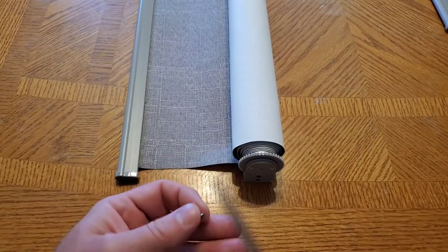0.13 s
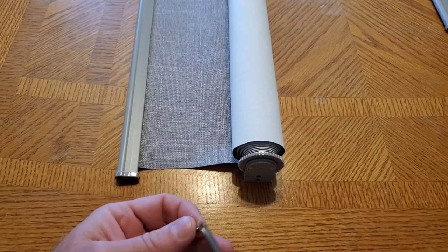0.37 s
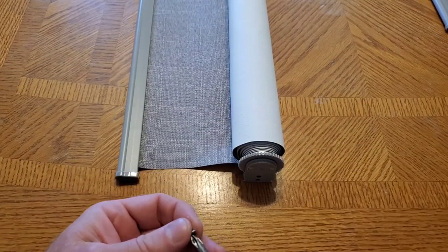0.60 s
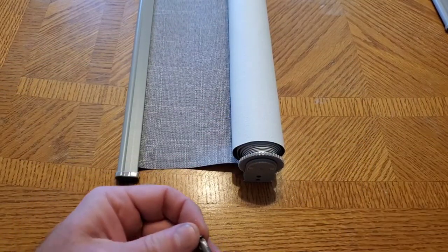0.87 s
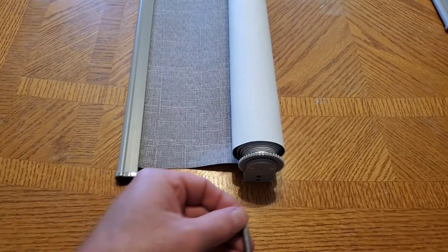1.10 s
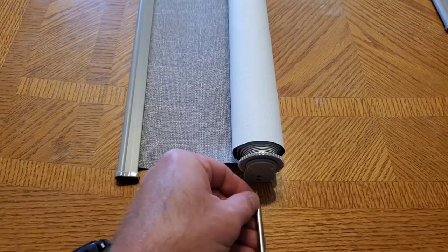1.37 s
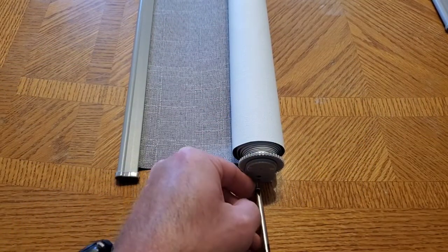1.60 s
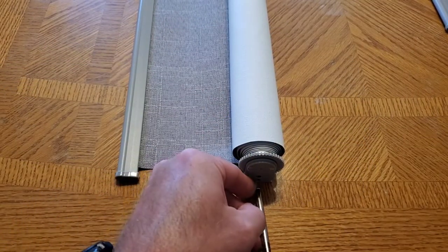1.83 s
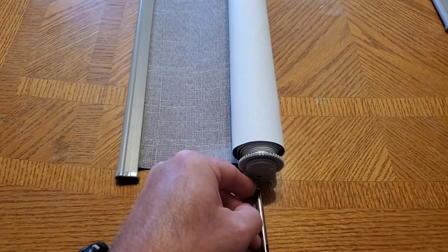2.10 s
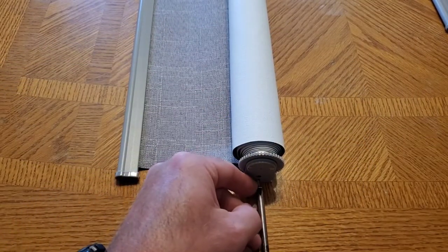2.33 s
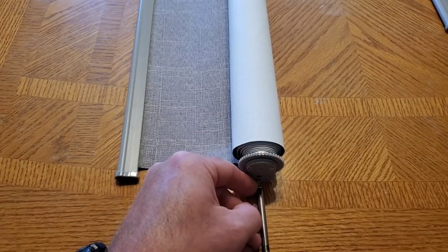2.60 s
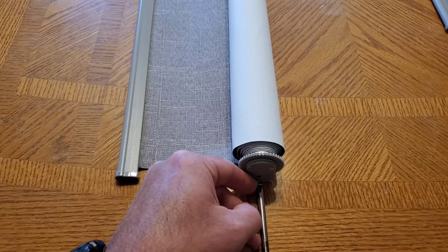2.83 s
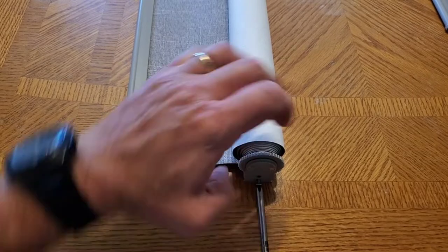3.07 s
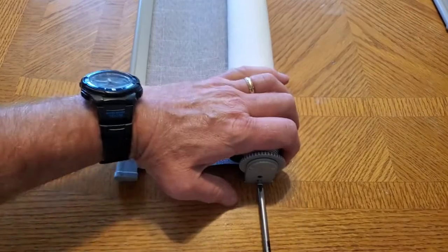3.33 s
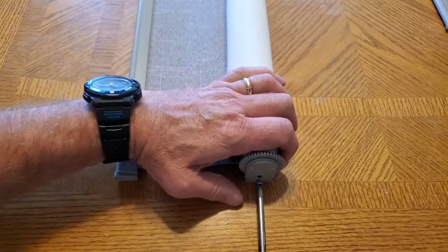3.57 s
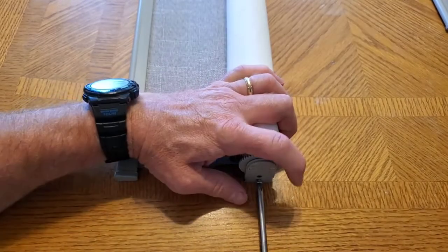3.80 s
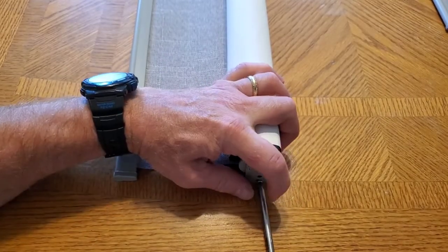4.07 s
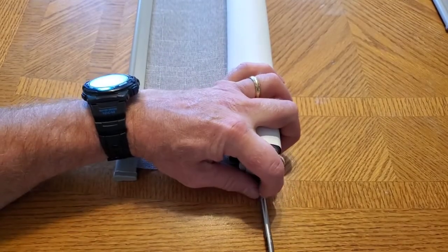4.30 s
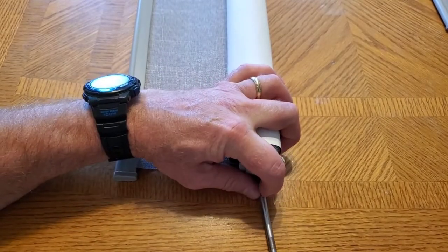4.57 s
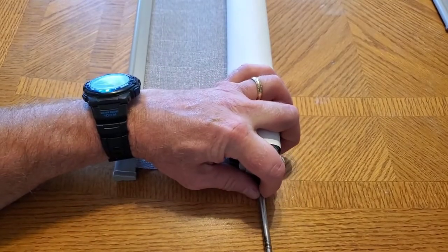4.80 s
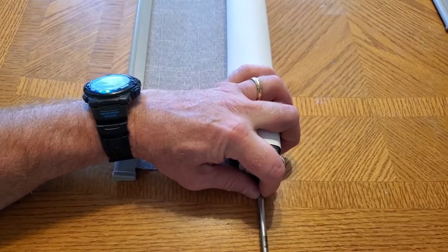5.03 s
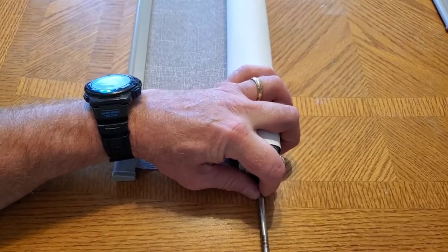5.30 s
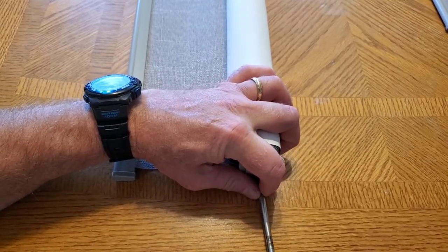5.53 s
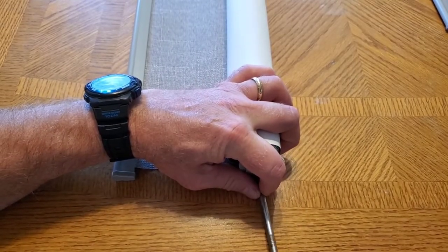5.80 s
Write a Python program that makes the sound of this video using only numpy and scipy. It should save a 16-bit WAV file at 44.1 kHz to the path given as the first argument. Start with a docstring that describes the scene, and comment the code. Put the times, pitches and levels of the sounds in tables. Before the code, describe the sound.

Quiet handling in a bare room: tiny metallic clicks, soft rustle, hollow knocks and short scrapes, building to one sharp loud clack near the end.

```python
"""Dull knocks with a wooden boom, small steel ticks, scraping and hand rustle in a bare room; hum and air below.
A screw is driven by hand into the plastic cap of a hollow roller tube lying on a wooden table.
Blows set resonances of cap, tube, table and steel ringing; trains of small slips rub the same resonances.
Contacts pass through a reverberant room; skin hiss and air are banded stereo noise.
Two wavering low hum lines and two faint hissy bands are resonated noise."""
import sys
import numpy as np
from scipy import signal
from scipy.io import wavfile

SR = 44100
rng = np.random.default_rng(int(sys.argv[2]) if len(sys.argv) > 2 else 0)


def voltage_ratio(decibels):
    """Convert decibels (scalar or array-like) to amplitude ratios, 20 dB per decade."""
    exponent = np.asarray(decibels, float) / 20
    return 10 ** exponent


def output_pcm(signal):
    """Save a mono or channel-first signal as 16-bit PCM at the path in sys.argv[1].

    Samples are clipped to [-1, 1] before scaling.
    """
    pcm = np.clip(np.atleast_2d(signal).T, -1, 1) * 32767
    wavfile.write(sys.argv[1], SR, np.round(pcm).astype(np.int16))


N = 260491
RUN_IN = 4410  # samples ahead of t = 0
EDGES = 30 * 2 ** np.arange(0, 9.3, 1 / 3)  # third-octave band edges/Hz

# resonances of the wooden table: f/Hz, level/dB, t60/s
TABLE_MODES = [(68.5, -25.5, 0.2), (107.5, -15, 0.19), (139.5, -18.5, 0.13), (180.1, -8, 0.048),
               (225, -16.5, 0.055)]
# resonances of the hollow tube: f/Hz, level/dB, t60/s
TUBE_MODES = [(283, -11.5, 0.23), (310.8, -7, 0.045), (370, -2.5, 0.049), (449.4, -8.5, 0.032),
              (524, -2, 0.014)]
# resonances of the plastic cap: f/Hz, level/dB, t60/s
CAP_MODES = [(573, -1.5, 0.019), (723.4, -7, 0.04), (823, -2.5, 0.038), (928, -8, 0.024), (1044, 1, 0.01),
             (1280, 3.5, 0.018), (1316.4, 5.5, 0.012), (1498, 2, 0.0079), (1595, -10.5, 0.0032)]
# resonances of loose parts under the cap: f/Hz, level/dB, t60/s
RATTLE_MODES = [(1840, 9.5, 0.005), (1987, 4, 0.015), (2470, 11, 0.0043), (3070, 1, 0.0081),
                (3300, 1, 0.0066), (3520, -1, 0.0076), (4200, -3.5, 0.0077), (4650, -2.5, 0.0043),
                (5070, -3, 0.0043)]
# resonances of the sharp crack: f/Hz, level/dB, t60/s
CRACK_MODES = [(5560, 2.5, 0.00076), (6600, 3, 0.002), (9450, 2.5, 0.0023), (11200, -1.5, 0.0015),
               (14500, 4, 0.0026)]
# left-right likeness of noise and echoes: f/Hz, likeness (0 to 1)
LIKENESS = [(40, 1), (120, 0.83), (300, 0.74), (1000, 0.035), (4000, 0.013), (16000, 0.023)]


def rms_one(x):
    """Scale to rms 1."""
    return x / np.sqrt(np.mean(x ** 2) + 1e-20)


def at_hz(points, hz):
    """Read a spectrum on a log frequency axis."""
    points = np.array(points)
    return np.interp(np.log(hz), np.log(points[:, 0]), points[:, 1])


def band(x, low_hz, high_hz):
    """One band of the filter bank."""
    return signal.sosfilt(signal.butter(2, [low_hz, high_hz], "band", fs=SR, output="sos"), x)


def stereo_band(white, low_hz, high_hz):
    """One band of noise whose mid/side balance sets the likeness of left and right."""
    mid, side = band(white, low_hz, high_hz)
    alike = np.clip(at_hz(LIKENESS, np.sqrt(low_hz * high_hz)), 0, 1)
    return np.sqrt(1 + alike) * mid + np.sqrt(1 - alike) * side * [[1], [-1]]


def banded_noise(spectrum):
    """Third-octave bands of stereo noise, each with its own level and likeness; rms 1."""
    out, white = 0, rng.standard_normal((2, 2, N))
    for k, (low_hz, high_hz) in enumerate(zip(EDGES, EDGES[1:])):
        gain = voltage_ratio(at_hz(spectrum, np.sqrt(low_hz * high_hz)))
        out = out + gain * stereo_band(white[k % 2], low_hz, high_hz)
    return rms_one(out)


def ring(clicks, hz, t60_s):
    """A two-pole resonator: a unit click starts a decaying sine of height 1."""
    r, w = voltage_ratio(-60 / (t60_s * SR)), 2 * np.pi * hz / SR
    return signal.lfilter([0, np.sin(w)], [1, -2 * r * np.cos(w), r * r], clicks + 1e-18)


def struck(times_s, levels_db, modes, contact_s, spread_db, chatter_s=0):
    """Each blow is a short contact driving every mode with its own random strength; hard tips skip a moment."""
    at = np.round(np.asarray(times_s) * SR).astype(int) + RUN_IN
    chance = rng.normal(0, 1, (len(at), len(modes)))
    t = np.arange(1200) / SR
    skipping = rms_one(t * np.exp(-t / max(chatter_s, 1e-4))) / np.sqrt(len(t))  # energy 1
    rough = rng.choice([-1, 1], N + RUN_IN)
    out = 0
    for k, (hz, level_db, t60_s) in enumerate(modes):
        clicks = np.zeros(N + RUN_IN)
        clicks[at] = voltage_ratio(levels_db + level_db + spread_db * chance[:, k])
        if chatter_s:
            chatter = signal.oaconvolve(clicks, skipping)[:len(clicks)]
            clicks = np.roll(rough, 997 * k) * chatter
        # neighbouring modes swing in opposite sense
        contact = t * np.exp(-t / contact_s) * np.cos(2 * np.pi * (hz * t + k / 2))
        contact /= abs(contact @ np.exp(-2j * np.pi * hz * t))  # gain 1 at the mode's pitch
        push = signal.oaconvolve(clicks, contact)[:len(clicks)]
        out = out + ring(push, hz, t60_s)
    return out


def rubbed(modes, per_s, size_db):
    """Dense small slips of uneven size and random sign set the modes sounding; rms 1."""
    count = N + RUN_IN
    happens = rng.random(count) < per_s / SR
    slips = happens * voltage_ratio(size_db * rng.exponential(1, count)) * rng.choice([-1, 1], count)
    return rms_one(sum(voltage_ratio(level_db) * ring(slips, hz, t60_s) for hz, level_db, t60_s in modes))


def swells(times_s, levels_db, fades_s, rise=0.8):
    """Gain of movements that rise and fade straight in dB; rise is a share of the fading time."""
    late_s = np.arange(-RUN_IN, N, 50)[None] / SR - np.asarray(times_s)[:, None]
    away = np.maximum(late_s, -late_s / rise) / np.maximum(fades_s, .01)[:, None]
    gain = voltage_ratio(levels_db[:, None] - 10 * away).sum(axis=0)
    return np.repeat(gain, 50)[:N + RUN_IN]  # held for 50 samples


def knocks():
    """The screw slips a notch or the tube rocks: cap, tube and table ring; heavy parts answer later."""
    # blows: t/s, cap level/dB, tube level/dB, table level/dB, softness (crack below cap)/dB
    blows = [(-0.02, -36.5, -39, -31.5, 2), (1.4313, -56.5, -41, -38, 42), (2.2437, -49, -38.5, -63.5, 51),
             (2.5165, -44, -40, -64, 31), (2.651, -52.5, -43, -73, 4.5), (2.7717, -40, -41, -77, 14.5),
             (2.9143, -67, -54, -61, -11), (3.303, -55, -49, -54, -4.5), (3.4532, -49.5, -41.5, -28.5, 18),
             (3.6727, -51.5, -46, -66.5, 4.5), (3.7968, -41, -32, -28, 15), (3.927, -37.5, -31.5, -27, 5.5),
             (4.0364, -43, -36, -23, 10), (4.4032, -55, -40.5, -30.5, 34), (4.612, -41.5, -38, -45, 30),
             (4.7289, -35, -34.5, -30, 26), (4.7845, -33.5, -31.5, -18.5, 29),
             (4.9922, -33.5, -32.5, -22.5, 22.5), (5.1531, -38.5, -34.5, -26, 19),
             (5.1982, -60, -56, -61, 8), (5.3006, -27.5, -28.5, -18.5, 8), (5.5075, -19, -20, -13.5, 8.5),
             (5.791, -62, -55, -77, 3.5)]
    # heel of the hand landing on the table: t/s, level/dB
    thuds = [(3.3237, -38.5), (4.4994, -28)]
    s, cap_db, tube_db, table_db, soft_db = np.transpose(blows)
    thud_s, thud_db = np.transpose(thuds)
    rattle_db = cap_db - 9 - 0.48 * soft_db  # the rattle loses 0.48 of the softness
    table = struck(np.r_[s, thud_s], np.r_[table_db, thud_db], TABLE_MODES, contact_s=.002, spread_db=1.5)
    tube = struck(s, tube_db, TUBE_MODES, contact_s=.001, spread_db=2.0)
    cap = struck(s, cap_db, CAP_MODES, contact_s=.0004, spread_db=1.8)
    rattle = struck(s, rattle_db, RATTLE_MODES, contact_s=0.000052, spread_db=0.33, chatter_s=.0025)
    crack = struck(s, cap_db - soft_db, CRACK_MODES, contact_s=.00005, spread_db=1.0, chatter_s=0.00044)
    return table + tube + cap + rattle + crack


def ticks():
    """The tip finds the slot: steel on steel, shaft and screw both ping."""
    # tip on the screw head: t/s, shaft level/dB, screw level/dB
    taps = [(0.508, -69.5, -64), (0.518, -55.5, -64), (0.5347, -63, -56), (0.5533, -82, -62),
            (0.608, -76, -72), (0.6959, -49, -42), (0.825, -52, -39), (0.8274, -46, -42),
            (3.7833, -61, -60), (3.79, -66, -63), (3.793, -76, -57), (5.5782, -48, -42)]
    # resonances of the tool shaft: f/Hz, level/dB, t60/s
    shaft_modes = [(3680, -4.5, 0.006), (4800, -1, 0.0013), (6160, 7, 0.0073), (6960, -30, 0.00092)]
    # resonances of the screw: f/Hz, level/dB, t60/s
    screw_modes = [(8900, 2.5, 0.0035), (9530, 10, 0.00083), (11300, 9, 0.0019), (13860, 17, 0.001),
                   (14500, 5, 0.0063), (14900, -8, 0.00086)]
    s, shaft_db, screw_db = np.transpose(taps)
    shaft = struck(s, shaft_db, shaft_modes, contact_s=.00008, spread_db=1.0, chatter_s=0.00061)
    screw = struck(s, screw_db, screw_modes, contact_s=.00005, spread_db=1.0, chatter_s=0.00073)
    return shaft + screw


def drags():
    """Tube and tool slide, the shaft scuffs the cap: slips ring low modes for drag, high ones for scrape."""
    # slides of tube and tool: peak t/s, dull drag level/dB, bright scrape level/dB, 10 dB fade/s (at least 0.01)
    pulls = [(-0.02, -58, -41.5, 0.0069), (0.661, -69.5, -63.5, 0.14), (2.82, -59, -71.5, 0.0644),
             (3.3, -68.5, -78, 0.3), (3.49, -62, -75, 0.1), (4.029, -63, -60.5, 0.01), (4.459, -51, -85, 0),
             (4.671, -40, -66.5, -0.07), (4.82, -63, -70, 0.02), (5.04, -47, -58.5, 0.02),
             (5.16, -75, -84, -0.8), (5.79, -60, -77, 0.1)]
    # shaft on the rim of the cap: peak t/s, level/dB, 10 dB fade/s (at least 0.01)
    scuffs = [(2.68, -67, .03), (4.48, -72.5, -0.05), (5.13, -76, 0.18), (5.314, -55, 0), (5.8, -79.5, 0.3)]
    s, dull_db, bright_db, fade_s = np.transpose(pulls)
    dull = rubbed(TUBE_MODES + CAP_MODES[:5], per_s=1200, size_db=4.5)
    bright = rubbed(CAP_MODES[7:] + RATTLE_MODES + CRACK_MODES[:1], per_s=3900, size_db=0.5)
    scuff = rubbed(RATTLE_MODES[3:6], per_s=1600, size_db=2.0)
    return (swells(s, dull_db, fade_s, rise=0.37) * dull
            + swells(s, bright_db, fade_s, rise=0.37) * bright
            + swells(*np.transpose(scuffs)) * scuff)


def table_shake():
    """Hand weight shakes the table: a resting rumble of its modes swells with each press."""
    # presses of the hand: peak t/s, level/dB, 10 dB fade/s (at least 0.01)
    presses = [(0.1, -60, .3), (1.06, -52, -0.21), (1.48, -63, 0.16), (3.5, -50, 0.1), (3.819, -43, 0.0043),
               (4.0, -36, -0.0159), (4.478, -37, -0.16), (4.68, -41, 0.09), (5.0, -35, -0.03),
               (5.19, -46.5, 0.07), (5.4, -42.5, 0.09), (5.661, -38.5, 0.02)]
    weight = voltage_ratio(-64) + swells(*np.transpose(presses))
    return weight * rubbed([(44.6, -4.5, 0.044)] + TABLE_MODES, per_s=460, size_db=3.0)


def skin_hiss():
    """Skin slides over cloth and wood: bright stereo noise swells above a faint resting level."""
    # slides of the skin: peak t/s, level/dB, 10 dB fade/s (at least 0.01)
    slides = [(0.62, -70, 0.1), (1.27, -70.5, .17), (1.81, -73.5, 0.1), (2.88, -75, 0.24),
              (3.36, -70.5, 0.16), (3.96, -72, 0.24), (4.08, -69, .1), (4.47, -70.5, 0.07),
              (4.75, -64, -0.27), (5.04, -69.5, 0.16), (5.4, -73.5, 0.27), (5.68, -66.5, 0.02)]
    # relative spectrum of the hiss: f/Hz, density/dB per Hz
    hiss_spectrum = [(3000, -16), (6000, -5), (9000, -3.5), (13000, -4.5), (16000, 4.5)]
    gain = voltage_ratio(-90) + swells(*np.transpose(slides))
    return gain[RUN_IN:] * banded_noise([(1500, -49)] + hiss_spectrum)


def hum():
    """Noise through resonators: two wavering low hum lines and two faint hissy bands, louder on the right."""
    # hum lines and hissy bands: f/Hz, rms before panning/dB, width/Hz
    bands = [(57.97, -58, 0.81), (116.5, -57.5, 3.8), (3290, -89.5, 440), (7490, -89, 410)]
    noise = rng.standard_normal((len(bands), N))
    mono = 0
    for white, (hz, level_db, width_hz) in zip(noise, bands):
        resonated = ring(white, hz, np.log(1000) / (np.pi * width_hz))
        mono = mono + voltage_ratio(level_db) * rms_one(resonated)
    return mono * voltage_ratio(np.array([[-1.5], [1.5]]))


def room_air():
    """Steady stereo noise, strongest in the bass, at -62.5 dB rms."""
    # relative spectrum of the air: f/Hz, density/dB per Hz
    air_spectrum = [(18, -43), (30, -28.5), (64, -0.5), (86, -10), (124, -49), (199, -26), (355, -10.5),
                    (415, -11.5), (526, -17), (666, -16), (988, -28), (7470, -47.5), (16000, -47)]
    return voltage_ratio(-62.5) * banded_noise(air_spectrum)


def room(x):
    """Direct sound plus a dense wash of echoes, other in each ear, dying at its own speed in each band."""
    # decay of the echoes, before the late thinning: f/Hz, t60/s
    decay = [(60, 0.24), (250, 0.38), (1000, 0.45), (4000, 0.44), (12000, 0.31)]
    # echoes over direct sound, before panning: f/Hz, level/dB
    echo_level = [(60, -2.5), (250, 5.5), (1000, 7.5), (4000, 7), (12000, -7)]
    # balance of the echoes: f/Hz, left over right/dB
    echo_pan = [(60, -11), (240, 0.5), (950, 0.5), (3770, 2), (15000, -2)]
    lag_s = 1.8e-5  # right ear after left
    t = np.arange(SR * 3 // 4) / SR
    white, echoes = rng.standard_normal((2, 2, len(t))), np.zeros((2, len(t)))
    build_up = (1 - np.exp(-t / 0.0055)) * np.exp(-(t / .5) ** 2)  # late echoes thin out faster
    arrival = np.sinc(t * SR - 8 - np.array([[0], [lag_s * SR]]))
    for k, (low_hz, high_hz) in enumerate(zip(EDGES, EDGES[1:])):
        hz = np.sqrt(low_hz * high_hz)
        fading = build_up * voltage_ratio(-60 * t / at_hz(decay, hz))
        wash = stereo_band(white[k % 2], low_hz, high_hz) * fading
        direct = band(arrival, low_hz, high_hz)
        match = np.sqrt(np.sum(direct ** 2, axis=1) / np.sum(wash ** 2, axis=1))[:, None]
        wash *= voltage_ratio(at_hz(echo_level, hz)) * match
        echoes += wash * voltage_ratio(at_hz(echo_pan, hz) / 2 * np.array([[1], [-1]]))
    return signal.fftconvolve(x[None], arrival + echoes, axes=1)[:, RUN_IN:RUN_IN + N]


def scene():
    """Contacts go through the room; skin hiss, air and hum are already stereo."""
    contacts = knocks() + ticks() + drags() + table_shake()
    return room(contacts) + skin_hiss() + room_air() + hum()


def roll_off(x):
    """The treble ends steeply here."""
    return signal.sosfilt(signal.butter(12, 16830, fs=SR, output="sos"), x)


def record(dry):
    """The microphone drops the deepest bass, below 42 Hz."""
    low_cut = signal.butter(4, 42, "high", fs=SR, output="sos")
    mix = signal.sosfilt(low_cut, dry)
    return roll_off(mix)


dry = scene()
out = record(dry)
output_pcm(out)
```